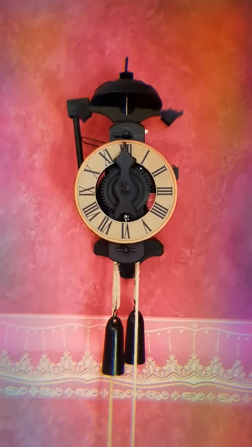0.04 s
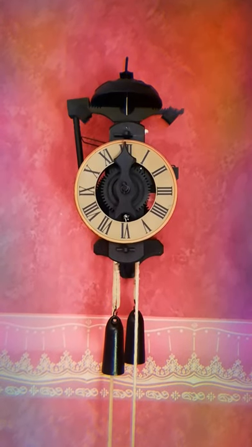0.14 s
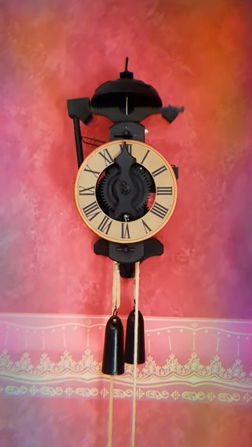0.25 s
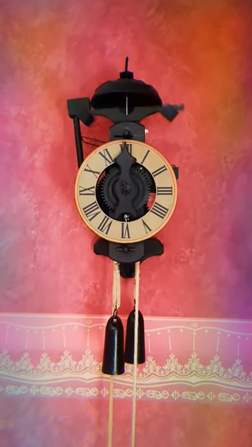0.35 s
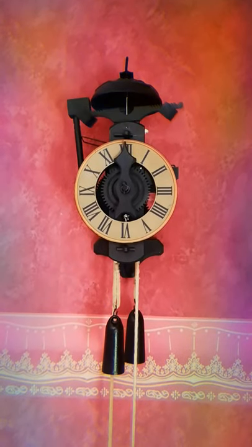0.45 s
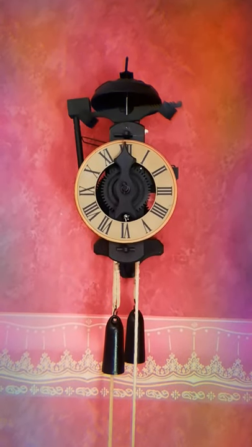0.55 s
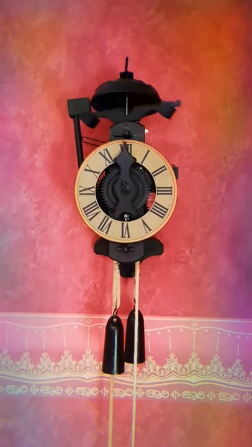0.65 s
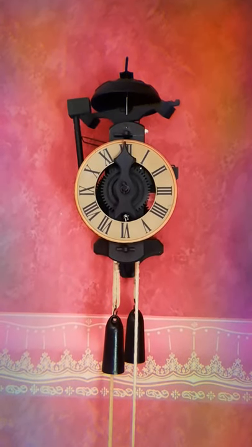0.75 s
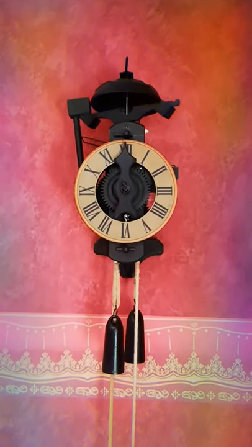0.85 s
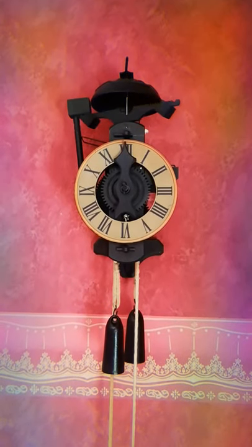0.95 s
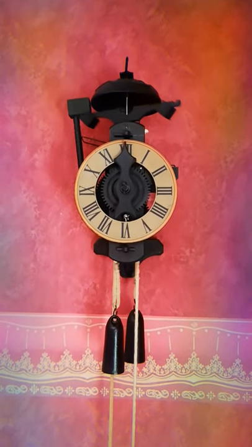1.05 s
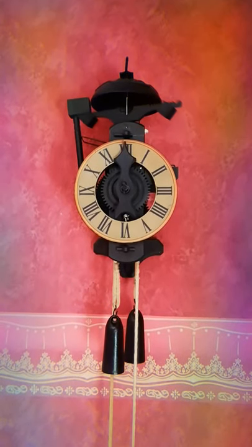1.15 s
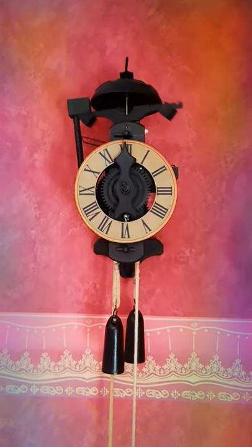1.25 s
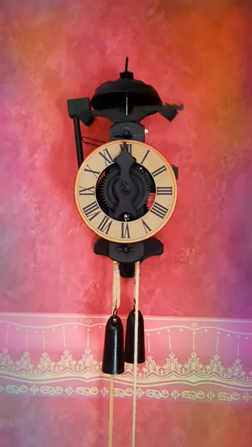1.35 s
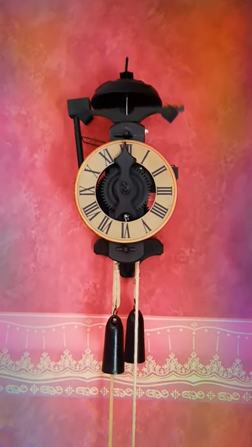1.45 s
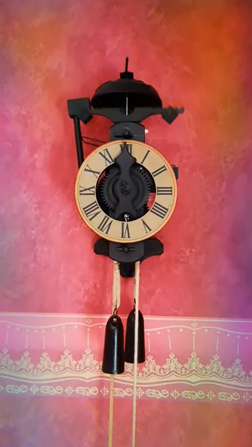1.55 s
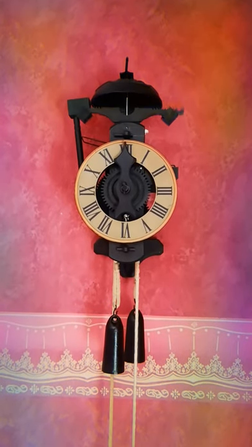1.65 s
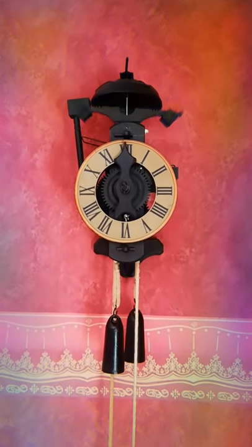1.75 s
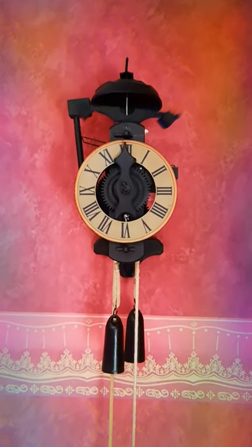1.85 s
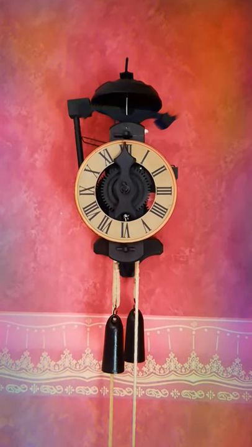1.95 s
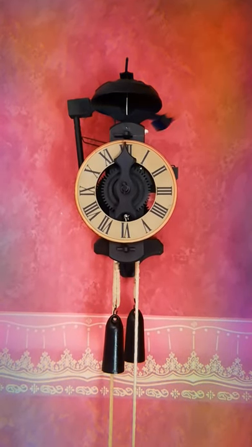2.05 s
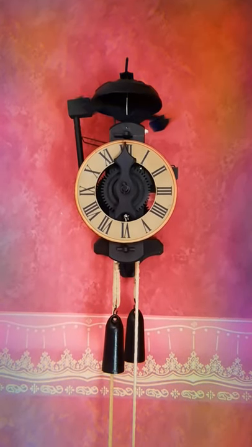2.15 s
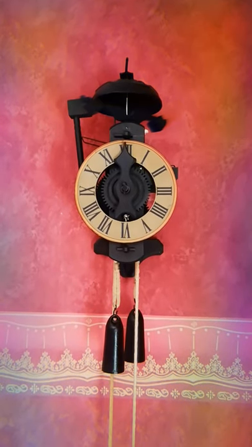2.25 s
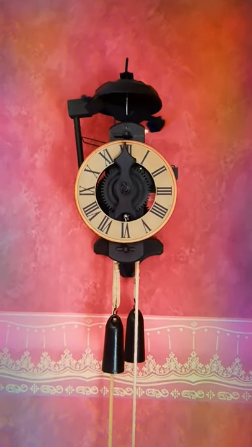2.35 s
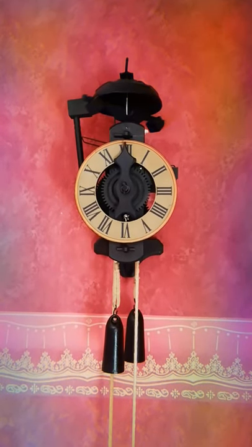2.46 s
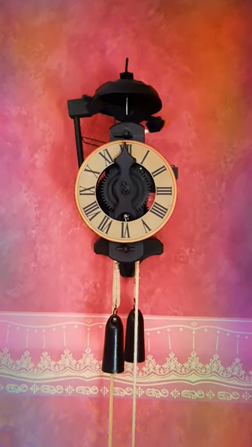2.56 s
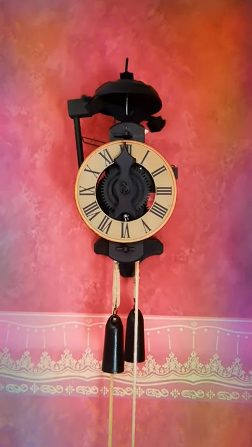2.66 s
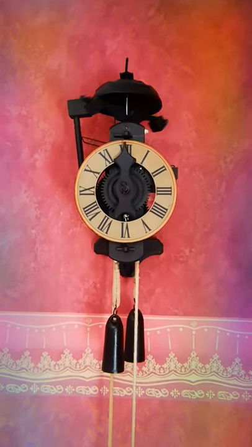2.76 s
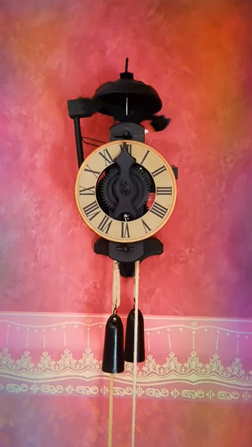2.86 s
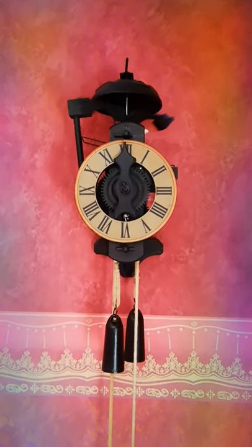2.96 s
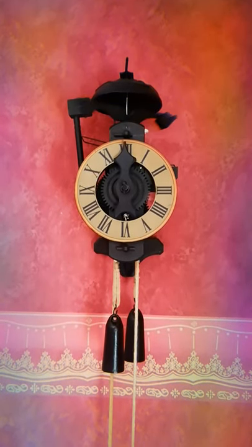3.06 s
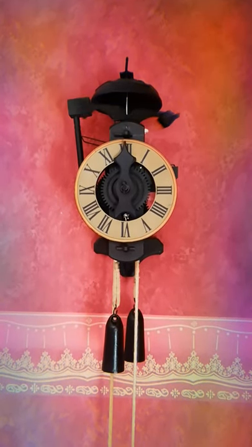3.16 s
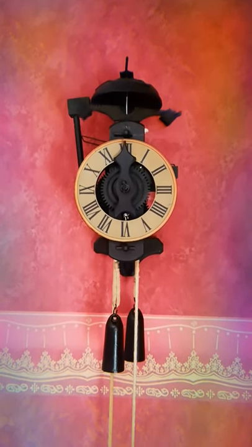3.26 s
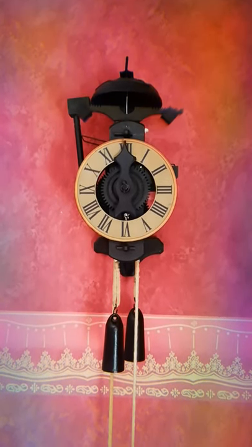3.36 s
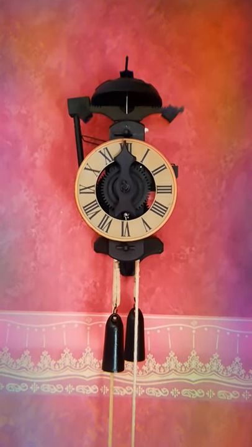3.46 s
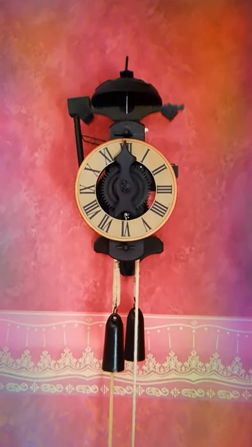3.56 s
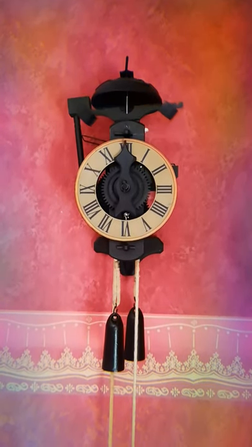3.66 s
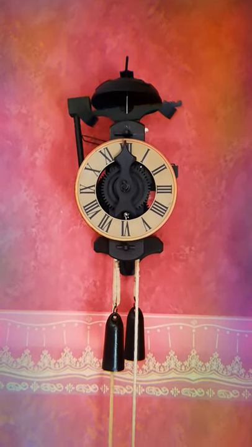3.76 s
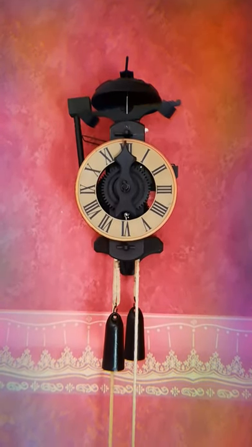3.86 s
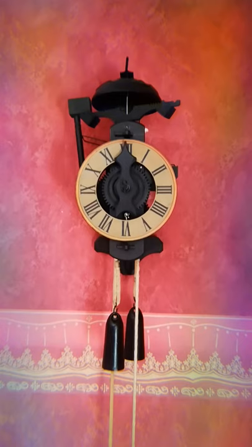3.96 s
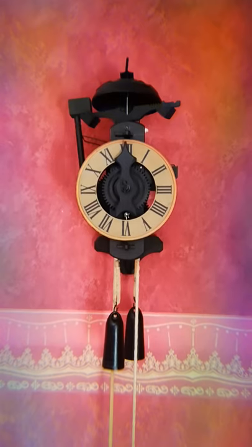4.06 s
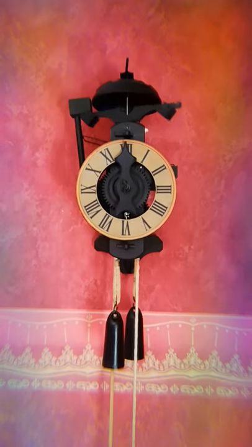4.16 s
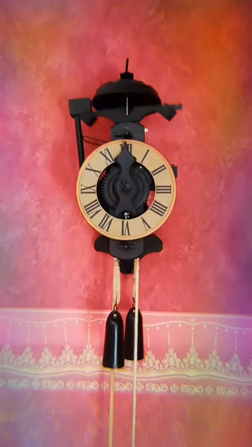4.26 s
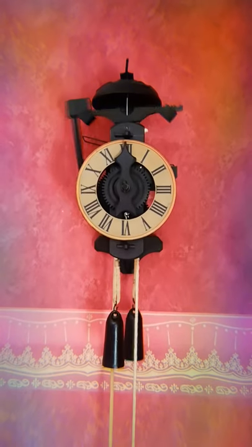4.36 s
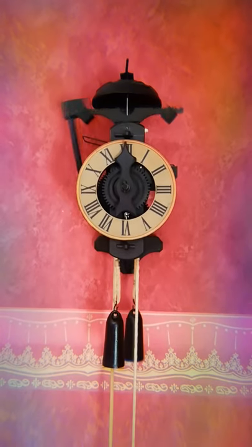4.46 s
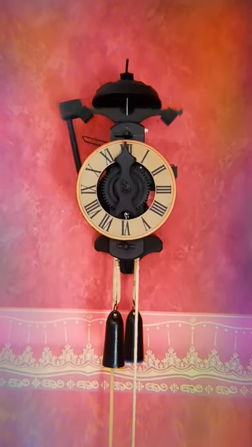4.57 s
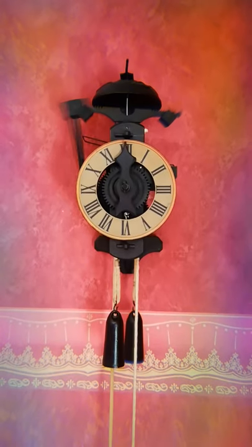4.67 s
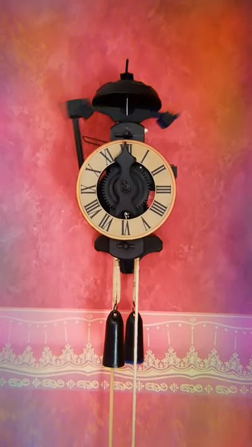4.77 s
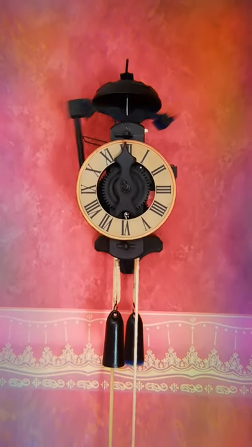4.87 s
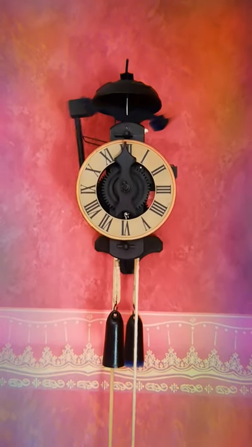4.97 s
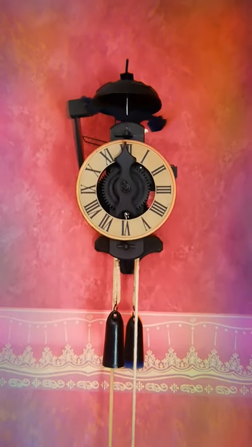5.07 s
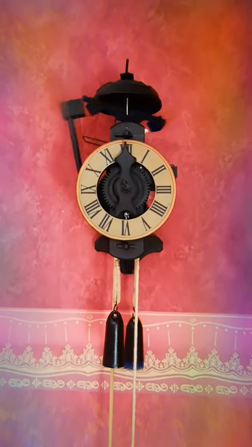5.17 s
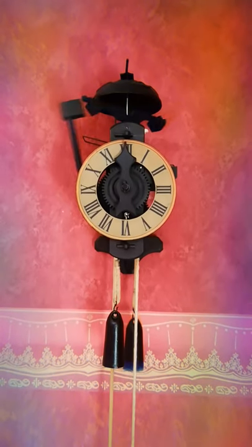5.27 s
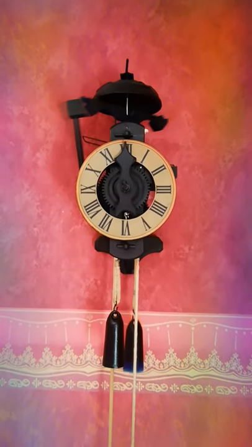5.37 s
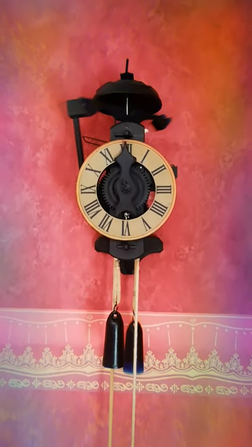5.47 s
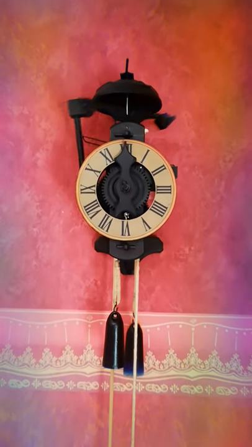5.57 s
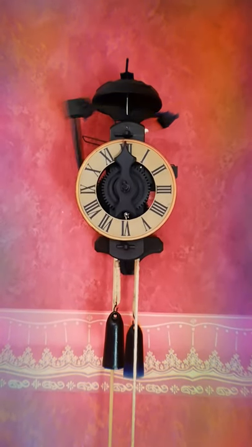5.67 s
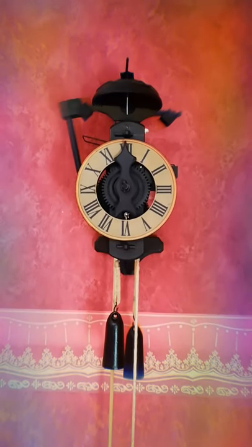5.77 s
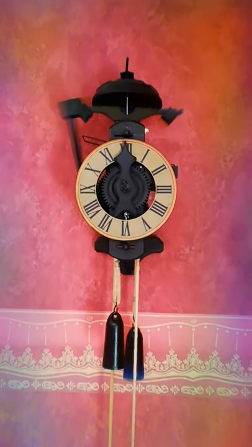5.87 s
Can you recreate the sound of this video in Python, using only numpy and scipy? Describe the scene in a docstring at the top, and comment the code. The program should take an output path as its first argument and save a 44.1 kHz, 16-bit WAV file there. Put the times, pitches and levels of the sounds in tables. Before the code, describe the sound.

A weight-driven wooden wall clock in a bare, lively room. Faint woody ticks and tocks over quiet air and a low drone, with small lever clicks. Near four seconds a lever drops with a sharp clack, gears spin up with a dry rattle, and a hammer strikes the bell twice, bright and long-ringing. Stereo pickup at moderate distance, with audible room reflections.

```python
"""Wall clock striking two

A weight-driven wooden clock ticks and tocks faintly in a bare, lively room; a duller tick comes every second.
A lever drops with a clack, the strike train spins up and rattles, and a hammer hits the metal bell twice.
The bell is a sum of decaying sines whose close pairs beat; knocks, ticks and gears are coloured noise bursts.
Two microphone ports pick up direct sound and reverberation, over quiet room air and a low drone."""
import sys
import numpy as np
from scipy import signal
from scipy.fft import rfft, irfft, next_fast_len
from scipy.io import wavfile

SR = 44100
rng = np.random.default_rng(int(sys.argv[2]) if len(sys.argv) > 2 else 0)


def to_wav(s):
    """Save 16-bit WAV."""
    ch = np.atleast_2d(s).T  # columns
    pcm = np.round(np.clip(ch, -1, 1) * 32767)  # PCM
    wavfile.write(sys.argv[1], SR, pcm.astype(np.int16))


N = 261072
T = np.arange(N) / SR
HZ = np.fft.rfftfreq(N, 1 / SR)

# hammer strokes on the bell: (t/s, force/dB)
HAMMER_STROKES = [(4.7462, -.3), (5.4000, .7)]
# colour of the clock frame and gears: (f/Hz, level/dB per Hz)
FRAME_COLOUR = [(40, -25.5), (150, -14), (260, -20.5), (550, -26), (800, -18.5), (1150, -9), (1650, -1),
                (2400, 4), (3100, -2.5), (6200, -5.5), (7800, -4.5), (10500, -7.5), (13000, -17),
                (15000, -22)]
# phase by which the left port leads the right: (f/Hz, lead/rad)
LEFT_LEAD = [(100, 0.41), (1176, 0.86), (2740, 1.62), (4650, 1.24), (6750, 1.05), (12000, 1.7)]


def bell():
    """Each stroke adds decaying modes to what still rings; every mode builds up and dies at its own pace."""
    # modes, most in close pairs: (f/Hz, left level/dB, right level/dB, t60/s, build-up time/s)
    bell_modes = [(1170.2, -43, -38, 9, .09), (1176.3, -30.5, -32, 9, .075), (2727.7, -29, -40, 1.4, .08),
                  (2739.4, -23.5, -19.5, 1.7, .09), (2751, -25, -36, 1.2, .003),
                  (4591, -30, -29, 1.1, .002), (4641.5, -26, -14.5, .45, .001),
                  (4648.3, -24, -11.5, .95, .12), (4650, -14.5, -31, .85, .008),
                  (6725, -2.5, -14, .18, .017), (6741.1, -9.5, -10.5, .42, .001),
                  (6747.4, -2, -9, .22, .076), (9037, -43, -32, .4, .002), (9065, -36, -22, .4, .002),
                  (9077, -29, -18.5, .5, .008), (10897, -44, -28, .42, .025), (11710, -44, -33, .3, .002),
                  (11730, -45, -33, .3, .003), (13110, -51, -43, .27, .003), (14553, -49, -39, .24, .002)]
    # room share of each mode: (f/Hz, level/dB)
    bell_wet = [(1200, -17.5), (2700, -12.5), (4600, -15), (6700, -7.5), (9000, -11.5), (12000, -12.5)]
    near, sent = np.zeros((2, 2, N))
    for s, force_db in HAMMER_STROKES:
        t = T[T >= s] - s
        for hz, left_db, right_db, t60, build_s in bell_modes:
            envelope = amp(force_db - 60 * t / t60) * (1 - np.exp(-t / build_s))
            phase = 2 * np.pi * hz * t
            left = amp(left_db) * np.sin(phase)
            right = amp(right_db) * np.sin(phase - read(LEFT_LEAD, hz))
            mode = envelope * np.array([left, right])
            near[:, -len(t):] += mode
            sent[:, -len(t):] += amp(read(bell_wet, hz)) * mode
    return near + np.array([room(sent[0])[0], room(sent[1])[1]])


def strike_train(chatter_s=0.0047, wheels_db=-5.0, pins_db=-9):
    """Dull wheels, bright pins and knocks sound through the frame and set the iron levers ringing."""
    # loudest knocks of levers and pins, before the room: (t/s, level/dB, added treble/dB)
    knocks = [(4.095, -60, -3), (4.1458, -54.5, -5), (4.1974, -46.5, 3), (4.226, -38.5, -1),
              (4.291, -33, -2), (4.383, -34.5, -7), (4.3928, -30, -1.5), (4.503, -28, 1),
              (4.5478, -28.5, 3), (4.953, -28.5, -1), (5.045, -29, 1.5), (5.157, -29.5, 1),
              (5.3424, -25.5, 1.5), (5.7538, -29.5, -6), (5.8711, -27, 0)]
    # ringing iron levers: (f/Hz, level/dB, t60/s)
    iron = [(1724, -19, 0.013), (2270, -54, 0.19), (6830, -47, 0.13), (7604, -15.5, 0.012),
            (7640, -15, 0.043), (7810, -12.5, 0.023)]
    hammer_db, hammer_treble_db = -21.5, 3
    out = amp(wheels_db) * gears(treble_db=-1.0, teeth_per_s=130, spread_db=3.0, clump_db=6)
    out += amp(pins_db) * gears(treble_db=4.5, teeth_per_s=200, spread_db=5.5, clump_db=4)
    for s, db, treble_db in knocks:
        add(out, s, blow(db, FRAME_COLOUR, treble_db, chatter_s))
    # every stroke also jolts the frame
    for s, force_db in HAMMER_STROKES:
        add(out, s, blow(hammer_db + force_db, FRAME_COLOUR, hammer_treble_db, chatter_s))
    return placed(ringing(out, iron), direct_db=-1, wet_db=5)


def gears(treble_db, teeth_per_s, spread_db, clump_db, scrape_s=0.0012, clumps_hz=22):
    """Teeth click and scrape at random, in clumps as the wheels bind and run free."""
    # gears spin up, surge as the hammer falls, slow as it is lifted: (t/s, level/dB before wheel or pin share)
    run_level = [(4.2, -64), (4.32, -53), (4.52, -42.5), (4.76, -40), (4.9, -45), (5.15, -46),
                 (5.32, -46.5), (5.46, -40), (5.73, -49), (5.79, -49), (5.92, -45)]
    heights = amp(spread_db * np.minimum(rng.exponential(1, N), 3))
    clicks = heights * (rng.random(N) < teeth_per_s / SR)
    # each click opens a short decaying burst of noise
    scrape = signal.lfilter([1], [1, -np.exp(-1 / (scrape_s * SR))], clicks) * rng.standard_normal(N)
    clump_band = np.exp(-(HZ / clumps_hz - 1) ** 2)
    clumps = np.tanh(evened(irfft(rfft(rng.standard_normal(N)) * clump_band, N)))
    run_db = np.interp(T, *np.transpose(run_level), left=-140)
    level = amp(run_db + clump_db * clumps)
    return signal.oaconvolve(evened(scrape) * level, impulse(FRAME_COLOUR, treble_db))[:N]


def release(chatter_s=0.0026, count=4):
    """The lever that frees the strike train falls with a broad crack and bounces, each time a little weaker."""
    # the lever slips and lands in two blows, before the room: (t/s, level/dB, added treble/dB)
    clacks = [(3.754, -39, -16), (3.7582, -21, -3.5), (3.7686, -19, 3)]
    # colour of that lever: (f/Hz, level/dB per Hz)
    lever_colour = [(50, -15), (150, -20), (550, -22.5), (850, -17.5), (1250, -2.5), (2500, 2),
                    (3150, -1.5), (3520, 4), (4000, -6), (6700, -4), (7500, 1), (8600, -9), (11500, -14.5),
                    (13000, -28)]
    rebound_s, rebound_db, rebound_loss_db, rebound_treble_db = .017, -30.5, 0.2, 1
    out = np.zeros(N)
    for s, db, treble_db in clacks:
        add(out, s, blow(db, lever_colour, treble_db, chatter_s))
    landing_s = clacks[-1][0]
    for k in range(count):
        bounce = blow(rebound_db - k * rebound_loss_db, lever_colour, rebound_treble_db, chatter_s)
        add(out, landing_s + (k + 1) * rebound_s, bounce)
    return placed(out, direct_db=2.0, wet_db=4.0)


def escapement(wire_chatter_s=0.0027):
    """Two steady beats run against each other, with a few lever clicks and one bright tink of a thin wire."""
    # In the next three tables levels are before the room.
    # tick and tock, once a swing: (first t/s, level/dB, treble against middle/dB, note f/Hz, chatter/s)
    swing_beats = [(.381, -52.5, -23, 1590, 0.0055), (.836, -55, -16.5, 1910, .011)]
    # dull tick and faint after-tap every second, perhaps a second clock: columns as for the swing
    second_beats = [(.371, -54, -35, 1070, 0.015), (.700, -63, -21, 950, 0.027)]
    # levers click as the strike work gets ready: (t/s, level/dB, treble against middle/dB, note f/Hz, chatter/s)
    lever_clicks = [(0.2966, -44.5, -10, 1390, 0.0063), (.385, -54.5, -8.5, 1430, 0.0078),
                    (0.8939, -56.5, -3, 2020, 0.008), (1.9731, -45.5, -5, 1380, 0.0013),
                    (3.5705, -42.5, -6, 1650, .004)]
    # steel pallets ring at every tick and tock: (f/Hz, level/dB, t60/s)
    pallets = [(4500, -23.5, 0.06), (2260, -27, 0.039)]
    # the wire tinks once: (t/s, level/dB before the room)
    tink = (.893, -38.5)
    # colour of the wire: (f/Hz, level/dB)
    wire_colour = [(4900, -26), (5700, 4.5), (6400, -4), (7600, 1.5), (8800, -12.5), (10300, -11),
                   (11500, -25), (13000, -43)]
    # note of the wire: (f/Hz, level/dB, t60/s)
    wire_note = [(5720, -23, 0.052)]
    ticks = ringing(beating(swing_beats, period_s=.9072), pallets)
    ticks = ticks + beating(second_beats, period_s=1)
    for s, *kind in lever_clicks:
        add(ticks, s, tick(*kind))
    wire = np.zeros(N)
    tink_s, tink_db = tink
    add(wire, tink_s, blow(tink_db, wire_colour, 0, wire_chatter_s))
    clock = placed(ticks, direct_db=-8.5, wet_db=-0.5)
    return clock + placed(ringing(wire, wire_note), direct_db=-4, wet_db=-3.0)


def beating(beats, period_s):
    """Ticks of the same kind come back in every period."""
    out = np.zeros(N)
    for first_s, *kind in beats:
        for s in np.arange(first_s, T[-1], period_s):
            add(out, s, tick(*kind))
    return out


def tick(db, treble_db, hz, chatter_s, usual_treble_db=-8, ring_db=-20, ring_t60=0.015):
    """A soft tick with the woody note of the part that is hit."""
    # colour of the ticks: (f/Hz, level/dB per Hz)
    tick_colour = [(200, -8.5), (600, -23.5), (1050, -3.5), (1500, -1), (2350, -1), (3300, -10.5),
                   (4500, -10), (7000, -16.5), (10000, -16.5), (13500, -28), (15500, -21)]
    # the colour already counts for usual_treble_db
    contact = blow(db, tick_colour, treble_db - usual_treble_db, chatter_s)
    return ringing(contact, [(hz, ring_db, ring_t60)])


def rumble(s=4.5, length_s=0.13, db=-54, hz=48):
    """A brief deep rumble, low-passed noise, swells and fades shortly before the first stroke."""
    noise = evened(irfft(rfft(rng.standard_normal(N)) / (1 + (HZ / hz) ** 4), N))
    return amp(db) * noise * np.exp(-((T - s) / length_s) ** 2)


def air(hum_width_hz=6):
    """Quiet diffuse room noise over a wavering low drone, a narrow band of noise alike at both ports."""
    # colour of the room air: (f/Hz, level/dB per Hz)
    air_colour = [(15, -9.5), (30, -7.5), (48, -1), (65, -4), (120, -19), (210, -12), (320, -23.5),
                  (560, -28.5), (900, -25), (2200, -26), (3000, -31.5), (8000, -39), (10000, -43.5),
                  (16000, -44)]
    air_db, hum_hz, hum_db = -66, 44.5, -68.5
    hiss = irfft(rfft(ear_noise()) * amp(read(air_colour, HZ)), N)
    drone = irfft(rfft(rng.standard_normal(N)) / (1 + ((HZ - hum_hz) / hum_width_hz) ** 2), N)
    return amp(air_db) * evened(hiss) + amp(hum_db) * evened(drone)


def placed(x, direct_db, wet_db):
    """Direct sound and room reach two microphone ports; the highest treble favours the right one."""
    # level difference between the ports: (f/Hz, left minus right level/dB)
    side_levels = [(150, 0.5), (2400, -1), (4400, 1), (7800, 3), (9500, -16), (12000, -8.5), (15000, -4.5)]
    size = next_fast_len(N + SR // 10)
    hz = np.fft.rfftfreq(size, 1 / SR)
    lag = np.exp(-1j * read(LEFT_LEAD, hz))
    direct = rfft(x, size) * np.array([np.ones(len(hz)), lag])
    both = amp(direct_db) * direct + amp(wet_db) * rfft(room(x), size)
    balance = amp(np.outer([.5, -.5], read(side_levels, hz)))
    return irfft(both * balance, size)[:, :N]


def room(x, build_s=0.0005):
    """Dense reflections, different at each port, each band dying at its own speed."""
    # reverberation of the bare room: (f/Hz, t60/s)
    room_decay = [(200, 1), (700, 0.85), (1800, 0.78), (4600, 0.59), (12000, 0.41)]
    hz, t, z = signal.stft(ear_noise()[:, :SR], SR, nperseg=256)
    decay = amp(-60 * t / read(room_decay, hz)[:, None])
    tail = signal.istft(z * decay * (1 - np.exp(-t / build_s)), SR, nperseg=256)[1]
    return signal.fftconvolve(x[None], tail / np.linalg.norm(tail[0]), axes=1)[:, :N]


def ear_noise():
    """Diffuse noise at two ports: alike in the bass, almost unrelated in the treble."""
    # likeness of the ports: (f/Hz, left-right correlation)
    air_same = [(40, 0.92), (120, 1), (250, 0.67), (500, 0.023), (8000, 0.02)]
    a, b = rfft(rng.standard_normal((2, N)))
    same = np.clip(read(air_same, HZ), -1, 1)
    return irfft(np.array([a, same * a + np.sqrt(1 - same ** 2) * b]), N)


def blow(db, colour, treble_db, chatter_s):
    """Two parts meet and chatter for some milliseconds: decaying noise through the colour of the part."""
    t = T[:SR // 10]
    contact = rng.standard_normal(len(t)) * np.exp(-t / chatter_s)
    # same energy at every draw
    contact *= np.sqrt(chatter_s * SR / 2) / np.linalg.norm(contact)
    return amp(db) * signal.fftconvolve(contact, impulse(colour, treble_db))


def ringing(x, modes):
    """A sound together with the modes that it sets ringing."""
    t, ring = T[:SR // 2], 0
    for hz, db, t60 in modes:
        mode = amp(-60 * t / t60) * np.cos(2 * np.pi * hz * t)
        ring = ring + amp(db) * mode / np.linalg.norm(mode)
    return x + signal.oaconvolve(x, ring)[:len(x)]


def impulse(colour, treble_db=0, size=2048):
    """A causal (minimum-phase) click of unit energy with the given spectrum, tilted above the middle range."""
    hz = abs(np.fft.fftfreq(size, 1 / SR))
    db = read(colour, hz) + treble_db * read([(2500, 0), (8000, 1)], hz)
    spectrum = np.exp(np.conj(signal.hilbert(np.log(amp(db)))))
    click = np.fft.ifft(spectrum).real
    return click / np.linalg.norm(click)


def amp(db):
    """Decibels to amplitude."""
    return 10 ** (np.asarray(db) / 20)


def evened(x):
    """Scale to an overall RMS of one."""
    return x / np.sqrt(np.mean(x ** 2) + 1e-20)


def read(points, hz):
    """Read a table between its points, along a logarithmic frequency axis."""
    f, value = np.transpose(points)
    return np.interp(np.log(hz + 1), np.log(f + 1), value)


def add(mix, s, sound):
    """Lay a sound into the mix at s seconds, cut at the end of the mix."""
    part = mix[round(s * SR):][:len(sound)]
    part += sound[:len(part)]


def scene():
    """The striking clock in its room."""
    return bell() + strike_train() + release() + escapement() + rumble() + air()


def record(dry):
    """The recorder's band limit: a steep low-pass."""
    edge_hz = 15400
    low_pass = signal.firwin(255, edge_hz, window=("kaiser", 8), fs=SR)
    return signal.oaconvolve(dry, low_pass[None], "same")


dry = scene()
out = record(dry)
to_wav(out)
```